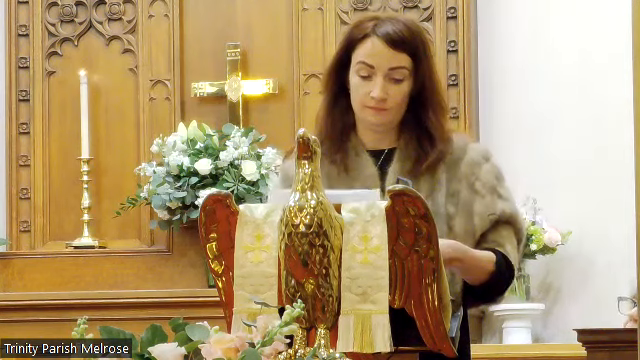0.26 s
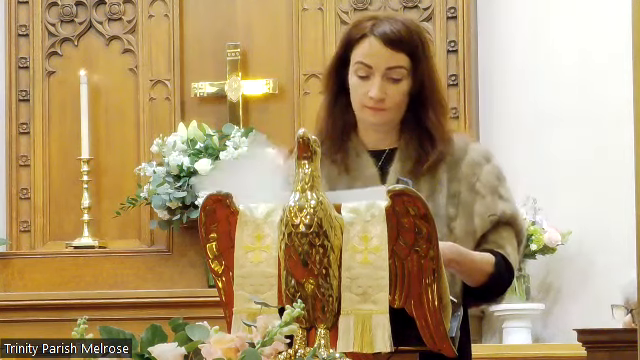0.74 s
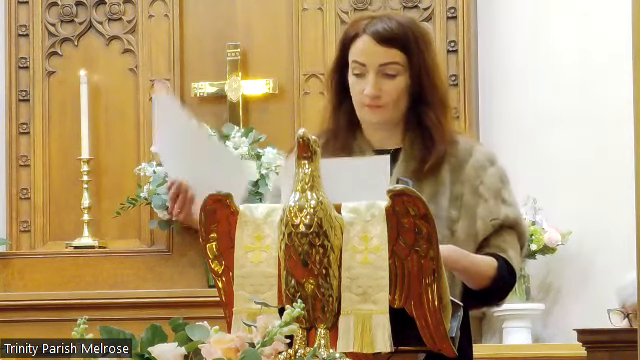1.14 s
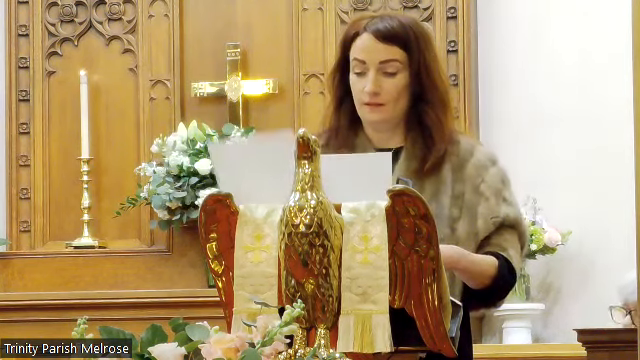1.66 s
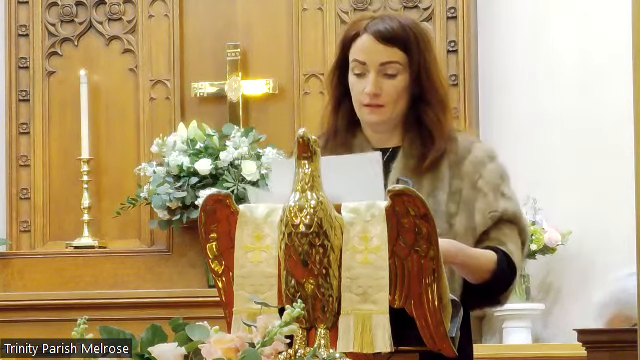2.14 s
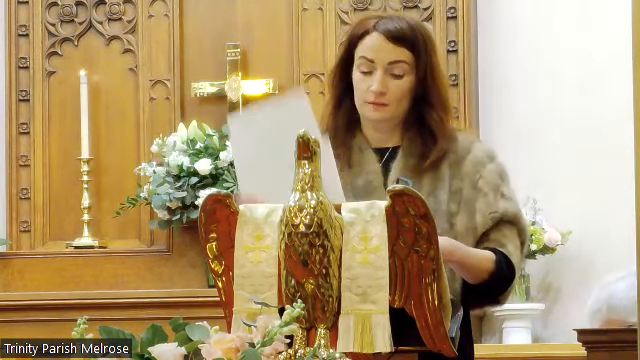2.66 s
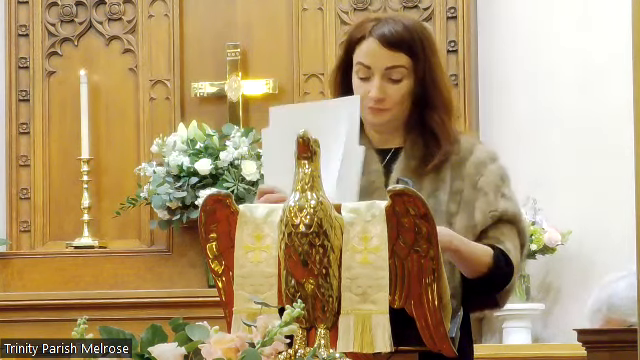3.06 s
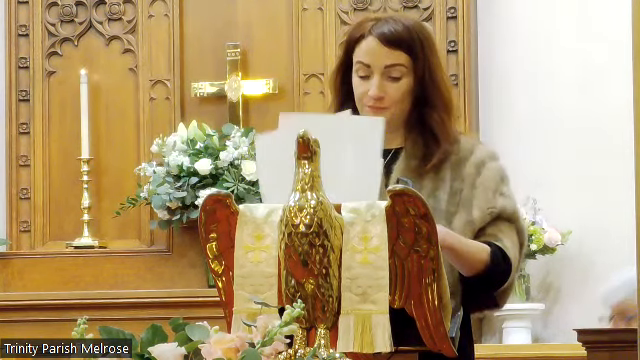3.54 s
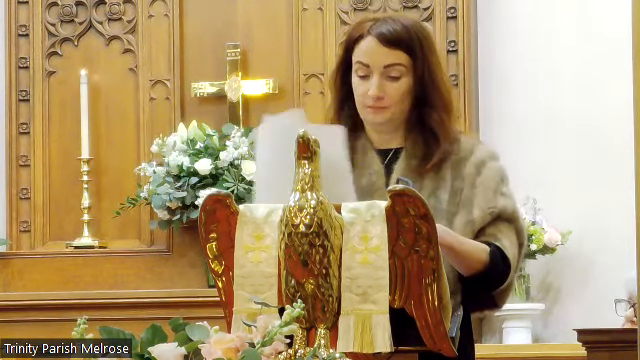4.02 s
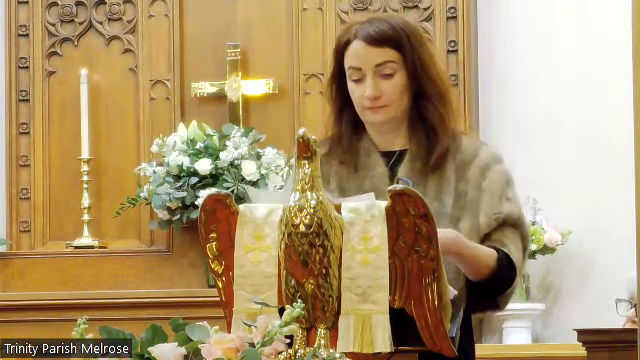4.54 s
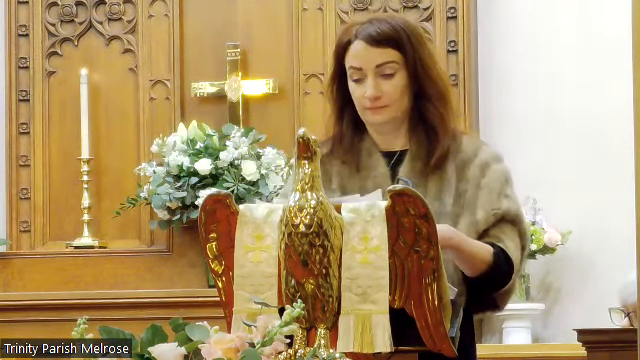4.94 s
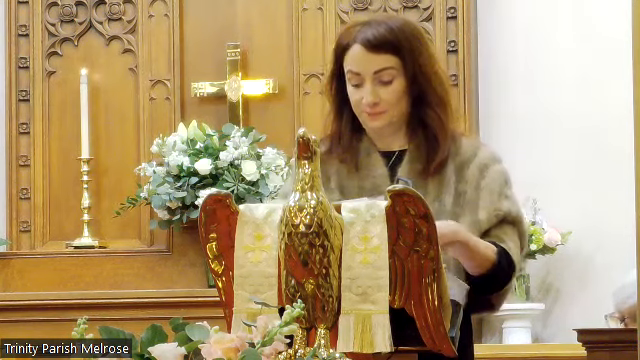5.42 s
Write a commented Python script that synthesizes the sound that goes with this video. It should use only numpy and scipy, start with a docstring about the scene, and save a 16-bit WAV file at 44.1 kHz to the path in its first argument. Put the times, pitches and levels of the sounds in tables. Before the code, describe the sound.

A person sorts papers on a hollow wooden stand: quick dry shuffles, a brief lull, one deep thud with a low scrape, then airy page swishes. A busy run of bright snaps, sharp taps and wooden bumps follows, ending in a cluster of low thumps. The last sheets brush lightly. Close, dry, essentially mono microphone; the hall is almost silent behind.

```python
"""Paper handled on a wooden lectern in a large hall, close to one microphone, over a suppressed hush.
Sheets hiss and crackle from the start as friction noise, with noise-and-tone creases snapping among them.
Near 1.5 s the stack knocks and is shoved along, and the wood's damped modes boom; near 2.5 s a fluttering,
gliding tone whooshes. Past 3.3 s taps, drags and snaps crowd together up to a second boom at 4.3 s.
From 4.7 s the last sheets rub on almost alone, with a steady swish near 7 kHz."""
import sys
import numpy as np
from scipy import signal
from scipy.fft import rfft, irfft, next_fast_len
from scipy.io import wavfile
from scipy.ndimage import uniform_filter1d, map_coordinates

SR = 44100
rng = np.random.default_rng(int(sys.argv[2]) if len(sys.argv) > 2 else 0)


def store_pcm(level_fs):
    """Save levels as 16-bit WAV."""
    pcm = np.round(np.clip(level_fs, -1, 1) * 32767).astype(np.int16)
    wavfile.write(sys.argv[1], SR, np.atleast_2d(pcm).T)


def nominal_scale(level):
    """Amplitude ratio for a level in decibels (scalar or array-like)."""
    x = np.asarray(level, float) / 20
    return 10 ** x


N = 250926
T = np.arange(N) / SR
GESTURE_T = T[::64]  # coarse clock for slow levels
FFT_SIZE = next_fast_len(N)
HZ = np.fft.rfftfreq(FFT_SIZE, 1 / SR)

# Spectrum of the hall's hush: [pitch_hz, density_db per Hz, relative]
HUSH_COLOUR = [(30, -26), (102, -23.5), (600, -33), (1110, -31.5), (1690, -14), (4540, -26), (5300, -27.5),
               (10200, -24.5), (15000, -45)]
# Faint whistles in the hush: [pitch_hz, width_hz, boost_db]
HUSH_WHISTLES = [(1715, 40, 11), (4540, 68, 14)]
# In the tables with full_level_s, the swell ends and the hold begins at that time.
# Narrow-band whooshes and swishes of the sheets, some gliding, one steady near 7 kHz:
# [full_level_s, held_s, fade_s per 20 dB (0.02 at least), level_db, first_pitch_hz, last_pitch_hz]
SHEET_WHOOSHES = [(2.511, 0.12, -1, -56.5, 1248, 840), (0.108, 0.044, -0.19, -44.5, 960, 888),
                  (3.842, 0.0086, 0.05, -44, 630, 623), (5.09, 0.27, 0.5, -59, 7000, 7030),
                  (5.45, 0.021, 0.08, -57, 560, 535.6), (5.52, 0.03, -0.58, -59, 590, 751)]
# Lectern modes, hollow body, side panels and desk top: [pitch_hz, gain_db, t60_s]
BODY_MODES = [(87.8, -0.5, 0.31), (114.5, 0.5, 0.14)]
PANEL_MODES = [(180, -11, 0.13), (238.3, -5.5, 0.044), (262.3, -5, 0.038), (310, -10, 0.26),
               (347, -5, 0.079)]
DESK_MODES = [(435, -13.5, 0.018), (674, -12.5, 0.034), (770, -17, 0.054), (1050, -15, 0.016)]
# Edges dragging on the wood:
# [full_level_s, held_s, panel_level_db, touched_panel_pitch_hz, desk_top_above_panel_db]
EDGE_DRAGS = [(0.0, 0.012, -41, 242, -3.5), (.2, 0.07, -49, 276, -2.5), (0.35, 0.16, -51, 310, -4.5),
              (0.565, 0.014, -42.5, 277.5, -6.5), (0.8, 0.17, -57.5, 353, -1), (1.466, 0.033, -41, 213, -9),
              (1.529, 0.14, -55.5, 214.6, 7.5), (1.885, 0.11, -60, 340, 10), (2.61, 0.075, -49, 318, -4.5),
              (2.755, 0.045, -49.5, 301, -14), (2.818, 0.021, -46.5, 173, -11.5),
              (2.9, 0.18, -61, 284, 1.5), (3.15, 0.15, -54.5, 361, 2.5), (3.361, .2, -42.5, 267, -5.5),
              (3.61, 0.01, -40, 251.6, 2), (3.709, 0.0064, -45, 234.5, -3.5),
              (3.849, 0.072, -48.5, 233, -0.5), (3.96, 0.029, -51.5, 266, -5.5),
              (4.144, 0.033, -46.5, 252.3, -21), (4.189, 0.018, -40, 255, -16.5),
              (4.288, 0.1, -43, 208.4, -2.5), (4.5, 0.11, -60, 246.5, -10)]
# The stack shoved along, booming in the hollow body: [full_level_s, held_s, level_db]
STACK_SHOVES = [(0.0, 0.013, -48), (1.462, 0.015, -35.5), (1.56, 0.064, -37), (1.72, 0.1, -50.5),
                (1.931, 0.091, -46.5), (3.383, 0.03, -40.5), (3.5, 0.11, -60), (3.742, 0.011, -55),
                (4.3, 0.12, -35), (4.47, 0.05, -49)]
# The stack knocking the lectern: [start_s, peak_level_db, contact_ms (0.2 at least)]
STACK_KNOCKS = [(0.001, -28, 4.0), (0.575, -29.5, 1), (1.456, -18, 6.3), (1.573, -27, 3.7),
                (1.881, -42, 0.4), (3.352, -31.5, 0.96), (3.48, -30.5, 0.74), (3.531, -29.5, 0.6),
                (3.581, -37.5, 0.6), (3.612, -28, 1.2), (3.621, -24.5, 0.2), (3.707, -38, 1.1),
                (3.731, -36.5, 1.1), (3.986, -37.5, 0.5), (4.175, -40, 1.5), (4.207, -39.5, 0.6),
                (4.292, -32.5, 4), (4.346, -26, 3.5), (4.386, -30.5, 4.5)]
# Creases snapping: [start_s, crack_level_db, pitch_hz]
CREASE_SNAPS = [(0.204, -20.5, 1800), (0.2612, -31.5, 2370), (0.744, -27, 2420), (0.774, -33.5, 2320),
                (1.4602, -22.5, 1824), (1.609, -31, 1750), (1.8799, -25.5, 1440), (2.478, -38.5, 1500),
                (2.603, -29, 8460), (2.98, -28.5, 3040), (3.005, -20, 5500), (3.2584, -27, 3560),
                (3.6162, -15.5, 2620), (4.291, -38, 1590), (4.351, -24, 3020), (4.4012, -23.5, 3340),
                (4.586, -26, 6380)]
# Colour of sliding paper: [pitch_hz, density_db per Hz, relative]
PAPER_COLOUR = [(530, -63.5), (900, -52), (1170, -21), (1310, -9.5), (1680, 1), (3880, -10), (4470, -7.5),
                (5390, -6), (6510, -1), (12100, -9), (15000, -35.5)]
# Narrow dips at fixed pitches, deeper when it is quiet: [centre_hz, width_hz, gain_db per dB of streak depth]
FIXED_NOTCHES = [(1960, 130, -1.5), (3716, 250, -2.5), (5280, 300, -5.0)]
# Strokes of sheet on sheet; flat and fast is bright, bent and slow is hollow:
# [full_level_s, held_s, fade_s per 20 dB, rub_level_db, brightness_db]
SHEET_STROKES = [(0.0, 0.011, 0.22, -51, -1), (0.103, 0.014, 0.21, -47, 1), (0.172, 0.038, 0.043, -47, 3),
                 (0.261, 0.011, 0.034, -57, 1.5), (.33, 0.22, 0.136, -63.5, 2),
                 (0.517, 0.041, 0.039, -49.5, 3), (0.562, 0.0087, 0.037, -44.5, 2.5),
                 (0.602, 0.0097, 0.0047, -39.5, 3.5), (0.653, 0.0087, 0.056, -53.5, 0),
                 (.69, 0.19, 0.3, -52.5, 1), (1.0, 0.015, 0.07, -50, 0), (1.457, 0.013, 0.11, -46.5, -3.5),
                 (1.61, 0.027, 0.71, -64.5, -4.5), (1.759, 0.074, 0.075, -51, 4), (1.881, 0.1, 0.2, -45, 4),
                 (2.214, 0.023, 0.79, -55, 1), (2.282, 0.0137, 0.24, -65.5, 16.5),
                 (2.495, 0.078, 0.091, -51, 3.5), (2.539, 0.078, 0.025, -44.5, 5),
                 (2.657, 0.0097, 0.08, -44.5, 4), (2.721, 0.02, 0.65, -57, 1.5),
                 (2.981, 0.034, 0.2, -44.5, 2.5), (3.1, 0.11, .1, -55, 0), (3.259, .1, 0.27, -46.5, 2),
                 (3.482, 0.013, 0.12, -43.5, 5.5), (3.581, 0.13, 0.12, -49.5, 0.5),
                 (3.849, 0.085, 0.12, -58.5, -0.5), (3.928, 0.035, 0.085, -52.5, 2.5),
                 (4.129, 0.082, 0.054, -66.5, 9), (4.298, 0.06, 0.36, -50.5, 1.5),
                 (4.348, 0.013, 0.014, -41.5, 2.5), (4.396, 0.0064, 0.073, -43.5, 4),
                 (4.454, 0.019, 0.052, -43.5, 2), (4.593, 0.017, 0.031, -46.5, 4),
                 (4.779, 0.049, 0.14, -67.5, 7.5), (4.864, 0.038, 0.086, -46.5, 3.5),
                 (5.12, 0.21, 0.083, -56.5, 3.5), (5.393, 0.04, 0.04, -51.5, 4),
                 (5.464, 0.021, 0.057, -45, 4.5), (5.54, 0.007, 0.056, -48.5, 2.5)]

HUSH_DB = -62.5  # ahead of the suppressor
HALL_DB, HALL_T60_S = -13, 0.42
WHOOSH_RISE_S = 0.012
DRAG_RISE_S, DRAG_FADE_S, DRAG_REST_DB = 0.024, 0.15, -84.5  # fades are per 20 dB
SHOVE_RISE_S, SHOVE_FADE_S, SHOVE_REST_DB = 0.017, 0.085, -77
STROKE_RISE_S = 0.017  # at brightness 0 dB
RISE_PER_HELD = 0.1  # long strokes gather slowly
STROKE_REST_DB = -79  # rub between strokes
REST_BRIGHT_DB = -13.5  # resting sheets only murmur
HOLLOW_PER_BRIGHT = -1.77  # dB of hollow part per dB of brightness
HOLLOW_LINGERS = 1.41  # the hollow part outlasts the sheen
HOLLOW_HZ, SHEEN_HZ = 2600, 5400  # hollow part below, sheen above
SIDE_DB = -32


def unit(x):
    """Scale to rms 1."""
    return x / np.sqrt(np.mean(x ** 2))


def bandpass(x, low_hz, high_hz):
    """Keep one band with gentle slopes."""
    return signal.sosfilt(signal.butter(2, [low_hz, high_hz], "band", fs=SR, output="sos"), x)


def colour(x, points, bumps=()):
    """Shape a sound's spectrum by (Hz, dB) points and optional resonances."""
    hz, db = np.transpose(points)
    gain_db = np.interp(np.log(HZ + 1), np.log(hz), db)
    for centre, width, peak_db in bumps:
        gain_db = gain_db + peak_db / (1 + (2 * (HZ - centre) / width) ** 2)
    return irfft(rfft(x, FFT_SIZE) * nominal_scale(gain_db), FFT_SIZE)[:N]


def walk(rate):
    """Random drift of rms 1 with straight slews between levels, rate new levels per second."""
    k = int(SR / rate)
    steps = np.repeat(rng.standard_normal(N // k + 1), k)
    return unit(uniform_filter1d(steps, k)[:N])


def gestures(full_s, held, db, rise, fade):
    """Power of each gesture, as rows: a straight swell up to full_s, a hold, a fade."""
    t = GESTURE_T - full_s[:, None]
    swell = np.log10(np.clip(1 + t / rise, 1e-9, 1))
    after_hold = np.maximum(t - np.maximum(held, 0)[:, None], 0)
    slope_db = 20 * (swell - after_hold / np.reshape(fade, (-1, 1)))
    return nominal_scale(2 * np.maximum(db[:, None] + slope_db, -150))


def summed_db(power, rest_db):
    """Level of overlapping gestures over a resting level."""
    return np.interp(T, GESTURE_T, 10 * np.log10(power.sum(axis=0) + nominal_scale(2 * rest_db)))


def ring(force, modes):
    """Answer of each damped mode to a force, as rows: a decaying cosine for every push."""
    rows = []
    for hz, db, t60 in modes:
        pole = np.exp(2j * np.pi * hz / SR - np.log(1000) / (t60 * SR))
        rows.append(nominal_scale(db) * signal.lfilter([1], [1, -pole], force).real)
    return np.array(rows)


def fibres(rate, spread, share):
    """Friction: an even hiss plus sparse fibre clicks (rate per second) of very unequal size."""
    size_db = spread * np.minimum(rng.exponential(size=N), 3)
    clicks = (rng.random(N) < rate / SR) * rng.standard_normal(N) * nominal_scale(size_db)
    hiss = rng.standard_normal(N)
    return np.sqrt(1 - share) * hiss + np.sqrt(share) * unit(clicks)


def hall_hush():
    """The hall's hush: steady coloured noise holding faint narrow whistles."""
    return nominal_scale(HUSH_DB) * unit(colour(rng.standard_normal(N), HUSH_COLOUR, HUSH_WHISTLES))


def hall(x):
    """A faint diffuse tail of decaying noise, starting after 12 ms."""
    t = T[:SR]
    tail = rng.standard_normal(SR) * np.exp(-np.log(1000) * t / HALL_T60_S) * (t > 0.012)
    return nominal_scale(HALL_DB) * signal.fftconvolve(x, tail / np.sqrt(np.sum(tail ** 2)))[:N]


def whooshes():
    """Narrow-band whooshes: a steady or gliding sine multiplied by random flutter."""
    full_s, held, fade, db, first_hz, last_hz = np.transpose(SHEET_WHOOSHES)
    out = 0
    for k, power in enumerate(gestures(full_s, held, db, WHOOSH_RISE_S, np.maximum(fade, 0.02))):
        hz = np.interp(T, [full_s[k], full_s[k] + held[k]], [first_hz[k], last_hz[k]])
        tone = np.sin(2 * np.pi * np.cumsum(hz) / SR)
        flutter = unit(ring(rng.standard_normal(N), [(25.2, 0, 70 / first_hz[k])])[0])
        level = np.interp(T, GESTURE_T, np.sqrt(2 * power))
        out = out + level * flutter * tone
    return out


def drags(power, near_spot_db):
    """Rough friction noise from edges and stack rings the panels, the desk top and the hollow body."""
    above_db = np.transpose(EDGE_DRAGS)[4]
    panel_db = summed_db(power, DRAG_REST_DB)
    desk_db = summed_db(power * nominal_scale(2 * above_db[:, None]), DRAG_REST_DB)
    shove_power = gestures(*np.transpose(STACK_SHOVES), SHOVE_RISE_S, SHOVE_FADE_S)
    boom_db = summed_db(shove_power, SHOVE_REST_DB)
    rough = fibres(rate=90, spread=1.5, share=0.35) * nominal_scale(3.5 * walk(25))
    panels = np.sum(ring(rough, PANEL_MODES) * nominal_scale(near_spot_db), axis=0)
    panels = panels / np.sqrt(np.sum(nominal_scale(2 * near_spot_db), axis=0))
    desk = sum(mode * nominal_scale(4 * walk(12)) for mode in ring(rough, DESK_MODES))
    body = ring(rough, BODY_MODES).sum(axis=0)
    return (nominal_scale(panel_db) * unit(bandpass(panels, 140, 480))
            + nominal_scale(desk_db) * unit(bandpass(desk, 420, 1300))
            + nominal_scale(boom_db) * unit(bandpass(body, 50, 150)))


def knocks(near_spot_db):
    """Smooth pushes strike the lectern modes; a longer contact is duller."""
    struck = ring(signal.unit_impulse(SR // 2), BODY_MODES + DESK_MODES + PANEL_MODES)
    out = np.zeros(2 * N)
    for s, db, ms in STACK_KNOCKS:
        start = int(s * SR)
        # a quick tap of a few sheets has too little mass to move the hollow body
        body_weight = np.full(len(BODY_MODES), (ms / 3.5) ** 2)
        # the spot struck picks the panel
        panel_weight = 2 * nominal_scale(near_spot_db[:, start] / 2)
        weights = np.r_[body_weight, np.ones(len(DESK_MODES)), panel_weight]
        push = np.hanning(int(max(ms, 0.2) * SR / 1000) + 2)
        blow = np.convolve(weights @ struck, push)
        out[start:][:len(blow)] -= nominal_scale(db) * blow / np.abs(blow).max()
    return signal.sosfilt(signal.butter(1, 28, "high", fs=SR, output="sos"), out[:N])


def lectern():
    """Wood rung by drags and knocks; where the edge touches decides which panel rings most."""
    full_s, held, db, hz, _ = np.transpose(EDGE_DRAGS)
    power = gestures(full_s, held, db, DRAG_RISE_S, DRAG_FADE_S)
    spot_hz = np.interp(T, GESTURE_T, hz @ power / power.sum(axis=0))
    # 55 dB down per octave away from the touched pitch
    near_spot_db = -55 * np.abs(np.log2(spot_hz / np.array(PANEL_MODES)[:, :1]))
    return drags(power, near_spot_db) + knocks(near_spot_db)


def snaps():
    """Each crease: a wide click, a crack of a few cycles that stops short, and a spray of noise."""
    out, t = np.zeros(N + 2048), np.arange(2048) / SR
    for s, db, hz in CREASE_SNAPS:
        noise = rng.standard_normal(2048)
        rise = 1 - np.exp(-t / 0.00068)
        crack = np.sin(2 * np.pi * hz * t) * np.exp(-(t * hz / 4.8) ** 2)
        click = nominal_scale(-7) * noise * np.exp(-t / 0.0019)
        spray = ring(noise, [(hz, -20, 6.5 / hz)])[0] * np.exp(-t / 0.009)
        out[int(s * SR):][:2048] += nominal_scale(db) * rise * (crack + click + spray)
    return bandpass(out[:N], 800, 8000)


def stroke_levels():
    """Levels of hollow part, rub and sheen: brightness tilts a stroke between them."""
    full_s, held, fade, db, bright_db = np.transpose(SHEET_STROKES)
    # hollow strokes start as slaps
    rise = (STROKE_RISE_S * nominal_scale(bright_db) + RISE_PER_HELD * held)[:, None]

    def part(above_db, lingers, rest_above_db):
        power = gestures(full_s, held, db + above_db, rise, fade * lingers)
        return summed_db(power, STROKE_REST_DB + rest_above_db)

    hollow_db = part(HOLLOW_PER_BRIGHT * bright_db, HOLLOW_LINGERS, -REST_BRIGHT_DB)
    return hollow_db, part(0, 1, 0), part(bright_db, 1, REST_BRIGHT_DB)


def streaks(shape):
    """Narrow streaks, like those noise suppression leaves, come, go and drift in pitch at random."""
    bands = rng.standard_normal(shape)
    for _ in range(2):
        bands = uniform_filter1d(uniform_filter1d(bands, size=4, axis=0), size=10, axis=1)
    drift_bins = 6 * walk(3)[::256]
    rows, columns = np.indices(shape)
    rows = rows + np.interp(columns, np.arange(len(drift_bins)), drift_bins)
    return unit(map_coordinates(bands, [rows, columns], order=1, mode="mirror"))


def sheets():
    """Sliding paper: coloured friction noise with random narrow streaks, deeper when it is quiet."""
    hollow_db, rub_db, sheen_db = stroke_levels()
    paper = colour(fibres(rate=1800, spread=3.2, share=0.2), PAPER_COLOUR)
    hz, s, frames = signal.stft(paper, SR, nperseg=1024, noverlap=768)
    depth_db = np.clip(2.2 + 0.26 * (-45.5 - np.interp(s, T, rub_db)), 1.5, 7)
    notches = sum(deep / (1 + (2 * (hz - centre) / width) ** 2) for centre, width, deep in FIXED_NOTCHES)
    hollow = 1 / (1 + (hz[:, None] / HOLLOW_HZ) ** 6)
    sheen = hz[:, None] > SHEEN_HZ
    bands = streaks(frames.shape) * np.where(sheen, 0.55, 0.75)
    frames = frames * nominal_scale((bands + notches[:, None]) * depth_db)
    parts = [(hollow * ~sheen, hollow_db), ((1 - hollow) * ~sheen, rub_db), (sheen, sheen_db)]
    total = 0
    for share, part_db in parts:
        part = frames * share
        # even out each part before its stroke levels are applied
        part = part / np.sqrt(uniform_filter1d(np.mean(np.abs(part) ** 2, axis=0), size=15))
        total = total + nominal_scale(part_db) * unit(signal.istft(part, nperseg=1024, noverlap=768)[1][:N])
    return nominal_scale(1.6 * walk(35) + 1.5 * walk(120)) * total


def scene():
    """Paper and wood, their hall tail and the hush reach one microphone, copied to two channels."""
    near = sheets() + snaps() + lectern() + whooshes()
    hush = hall_hush()
    return np.tile(near + hall(near) + hush, (2, 1))


def suppress(x, over_db=5, floor_db=-25.2):
    """Noise suppressor: takes each band's quiet level and turns down what barely exceeds it."""
    _, _, frames = signal.stft(x, nperseg=768, noverlap=576)
    raw = np.abs(frames) ** 2
    power = uniform_filter1d(uniform_filter1d(raw, size=2, axis=0), size=9, axis=1, origin=4)
    quick = uniform_filter1d(raw, size=3, axis=0)
    quiet = uniform_filter1d(np.percentile(power, 15, axis=1, keepdims=True), size=9, axis=0)
    quiet = quiet * nominal_scale(2 * over_db)
    power = np.maximum(power, 0.11 * quick)  # opens at once, closes slowly
    # lone bins survive as thin streaks
    gain = np.maximum((power / (power + quiet)) ** 0.84, nominal_scale(floor_db))
    return signal.istft(frames * gain, nperseg=768, noverlap=576)[1][:N]


def band_limit(x):
    """A steep low-pass at the top of the band."""
    return signal.sosfilt(signal.butter(12, 15170, fs=SR, output="sos"), x)


def record(dry):
    """Suppressor, steep top cut, then a trace of wandering width in the treble only."""
    mid = suppress(dry[0])
    mid = signal.sosfilt(signal.ellip(8, 0.3, 70, 14800, fs=SR, output="sos"), mid)
    treble = signal.sosfilt(signal.ellip(10, 0.5, 70, 5700, "high", fs=SR, output="sos"), mid)
    side = nominal_scale(SIDE_DB) * treble * walk(22)
    mix = np.array([mid + side, mid - side])
    return band_limit(mix)


dry = scene()
out = record(dry)
store_pcm(out)
```